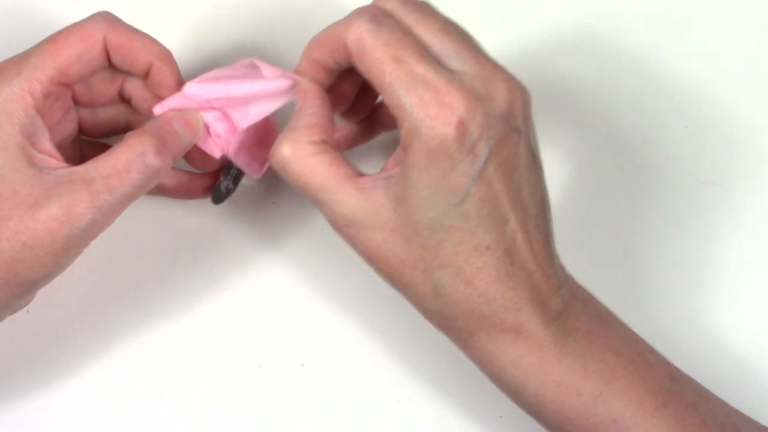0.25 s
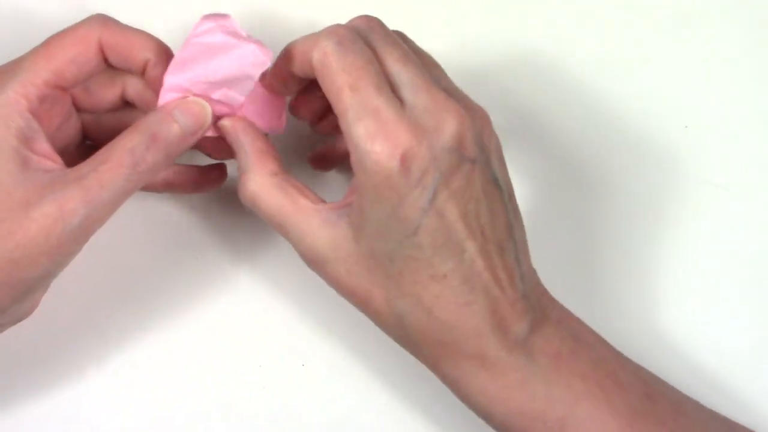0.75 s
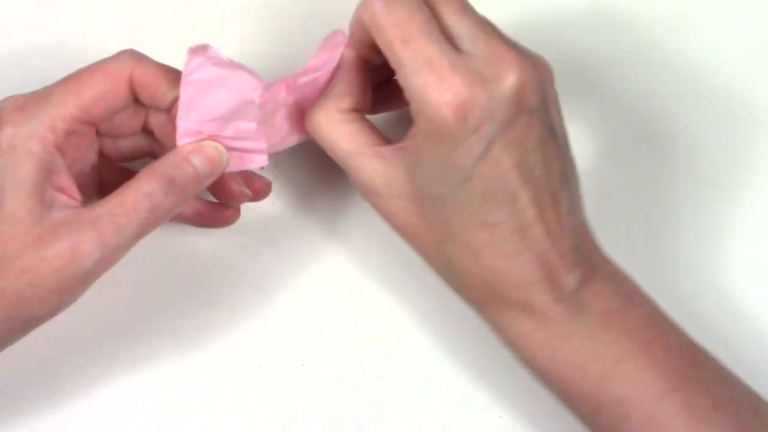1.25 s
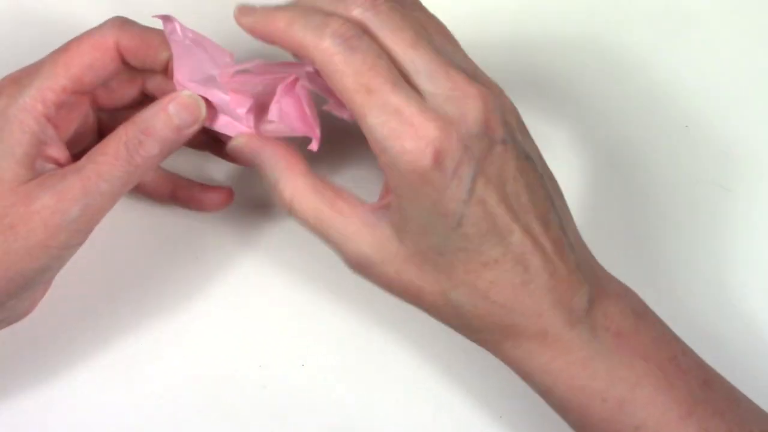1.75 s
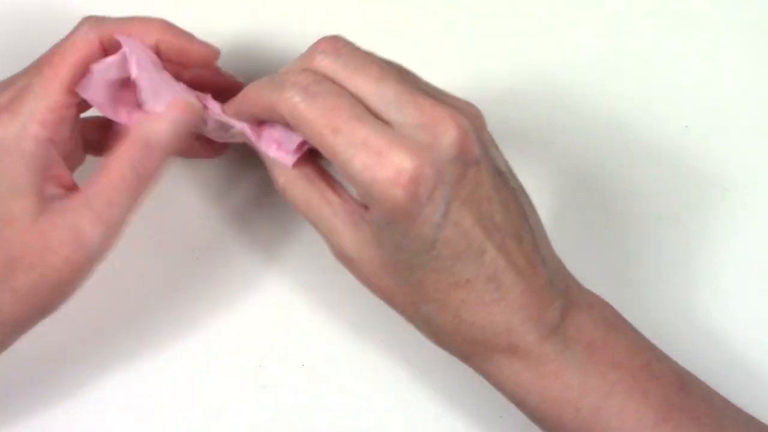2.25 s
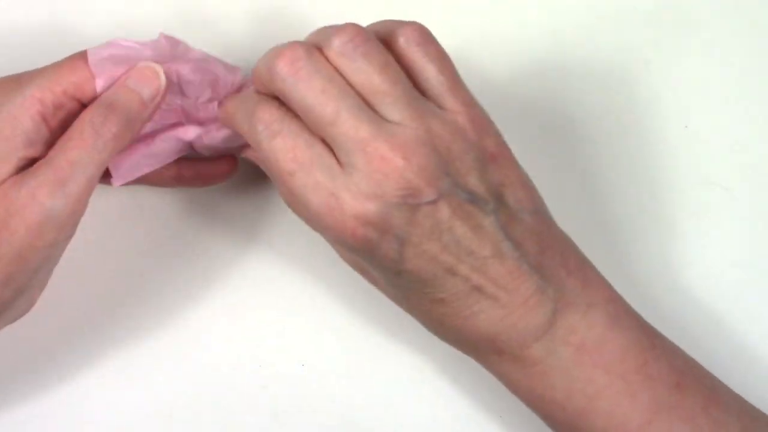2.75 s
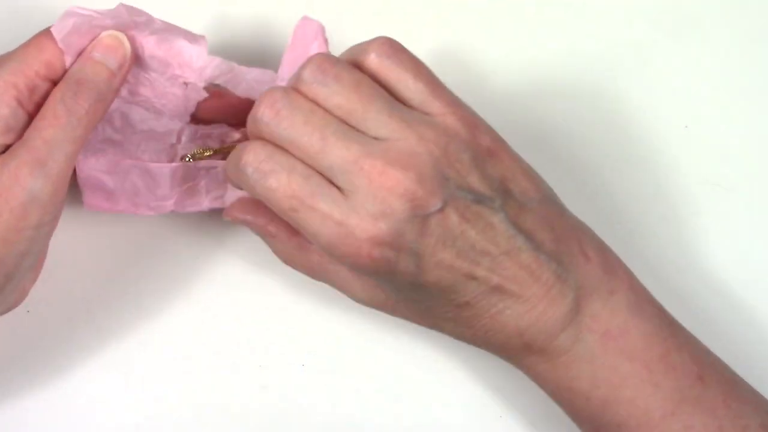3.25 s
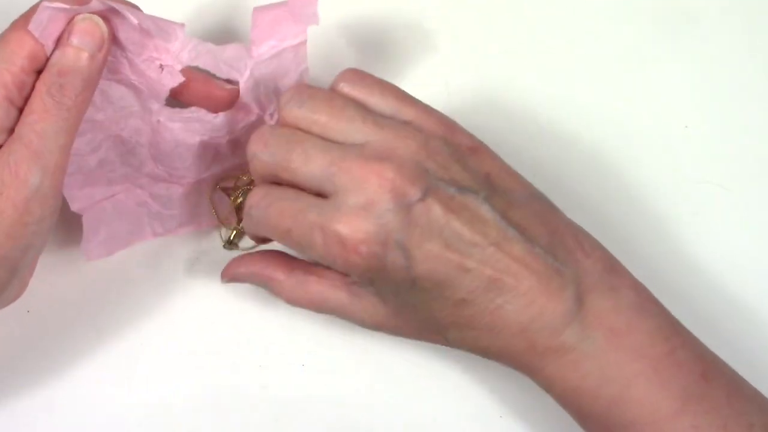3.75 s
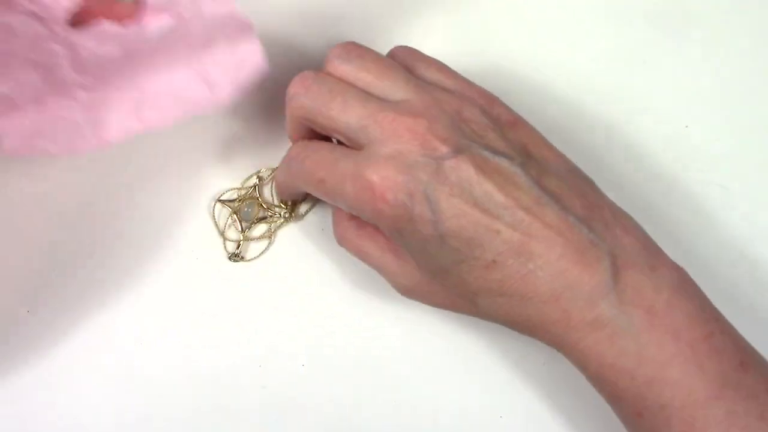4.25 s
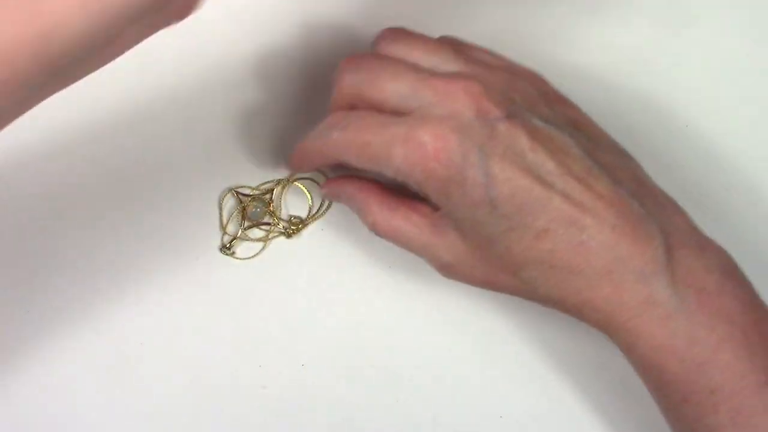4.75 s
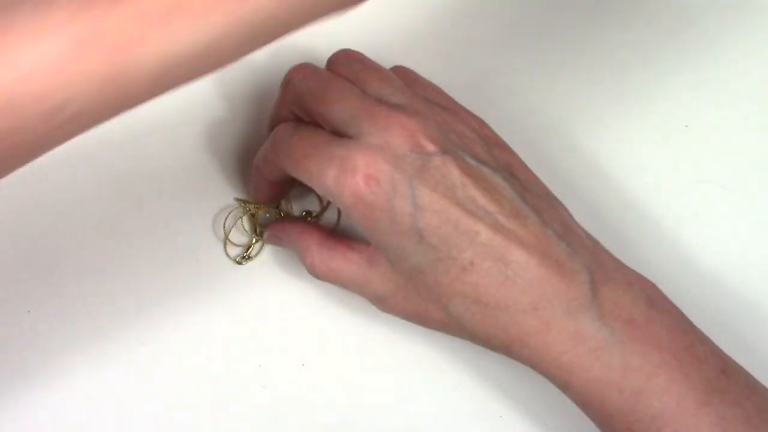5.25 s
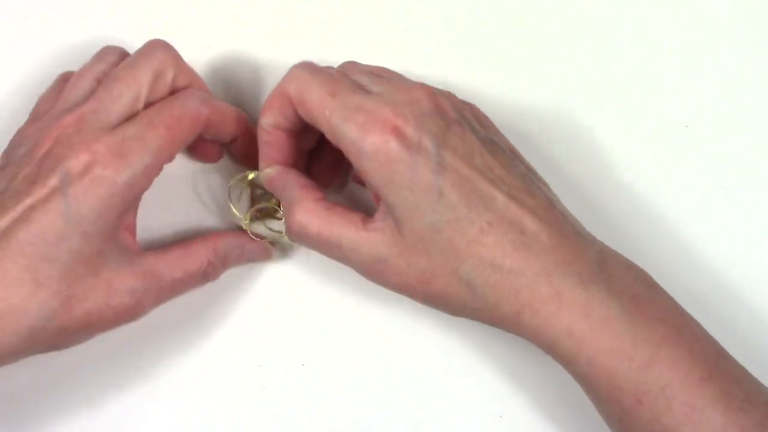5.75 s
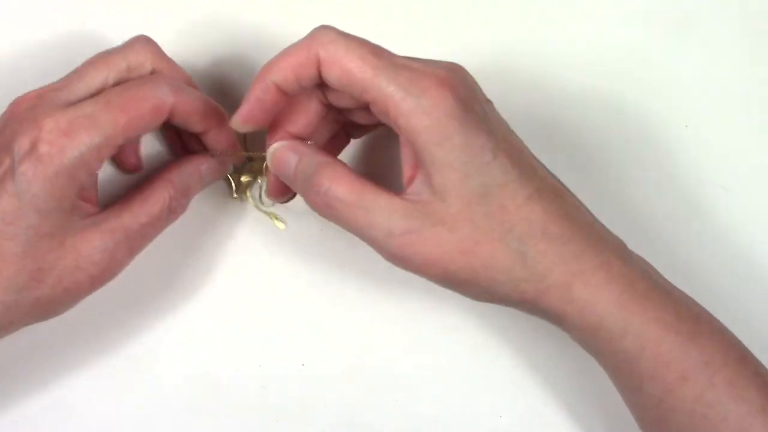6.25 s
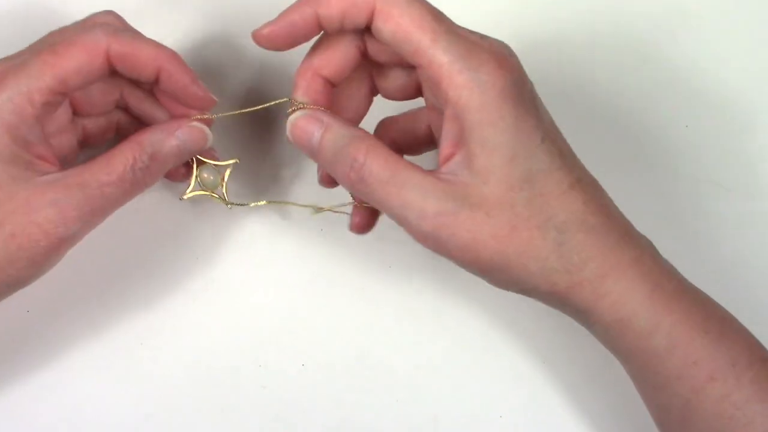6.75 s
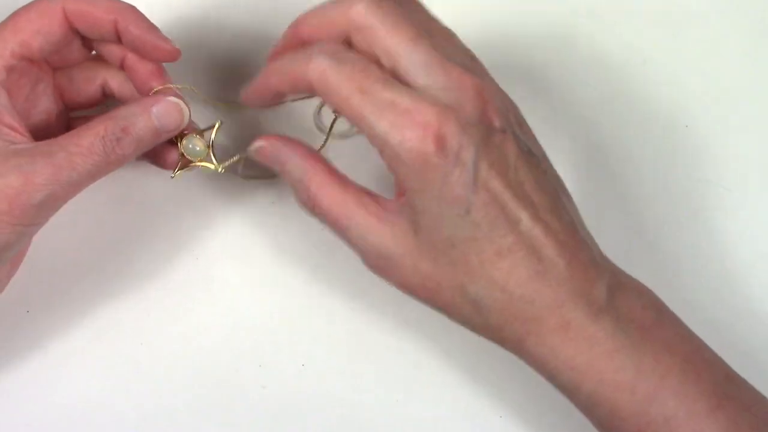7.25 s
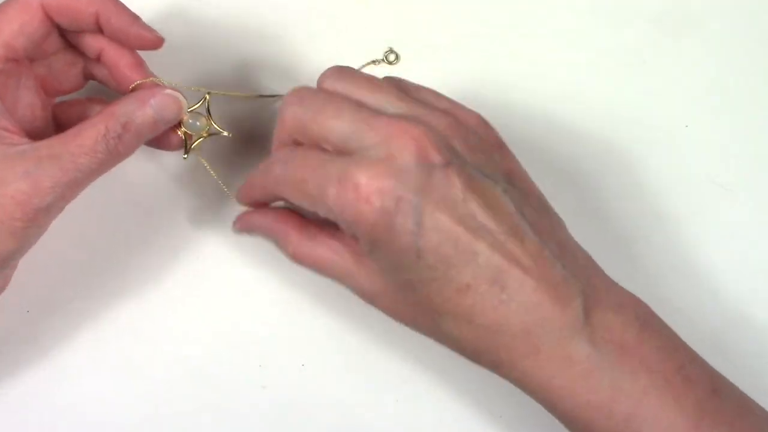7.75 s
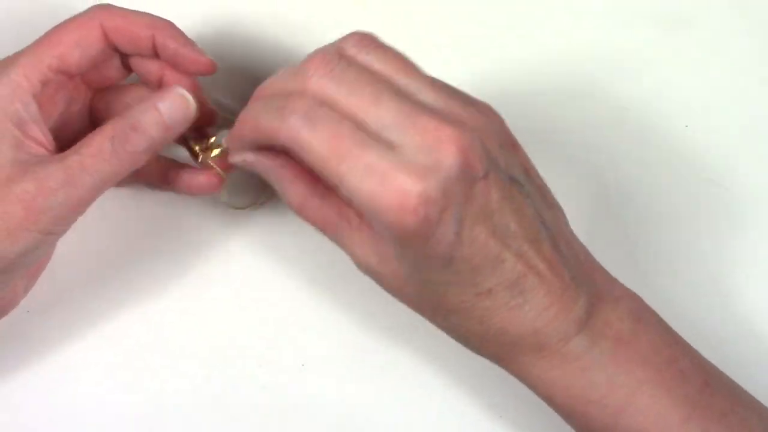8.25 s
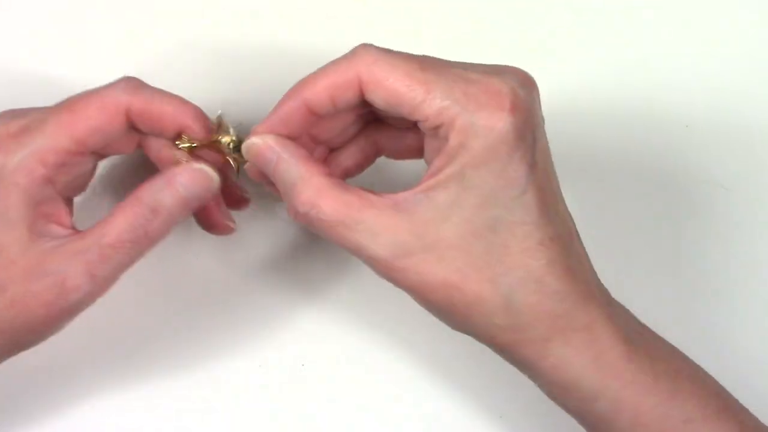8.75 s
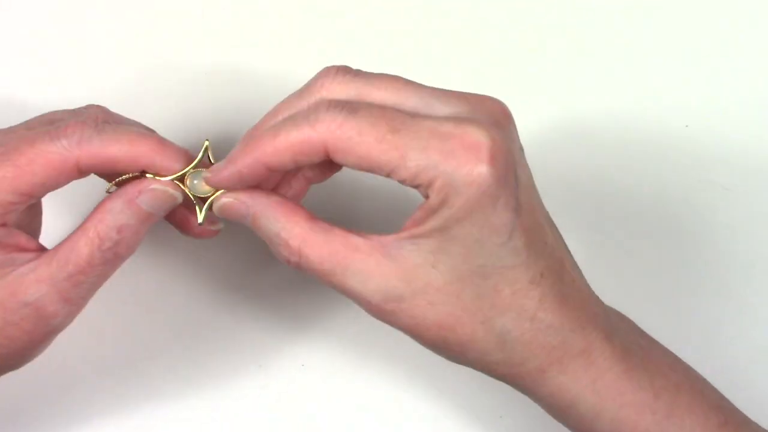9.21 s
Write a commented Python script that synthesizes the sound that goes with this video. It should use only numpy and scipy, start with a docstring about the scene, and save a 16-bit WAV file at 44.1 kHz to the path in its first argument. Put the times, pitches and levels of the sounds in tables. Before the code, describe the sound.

In a quiet room with a low hum and faint, rapid ticking, tissue paper crinkles and snaps in uneven bursts as it is unwrapped close to the microphone. A necklace falls out and knocks sharply on the table top. The paper stops, and fine metal links click, chatter and scrape on the table in short spells, growing softer near the end, while an arm and fingertips bump gently.

```python
"""A table in a quiet room, the microphone close to two hands unwrapping a thin metal necklace.
The tissue paper crackles as its small creases flip, and snaps when a larger one gives way.
The pendant drops and the chain taps, ringing the table top; the links scrape as they slide over it.
Fingertips and an arm thud and rumble on the table. Behind it all the room hums and a faint
mechanism ticks steadily."""
import sys
import numpy as np
from scipy import signal
from scipy.fft import rfft, irfft, next_fast_len
from scipy.io import wavfile
from scipy.ndimage import uniform_filter1d

SR = 44100
rng = np.random.default_rng(int(sys.argv[2]) if len(sys.argv) > 2 else 0)


def waveform_to_disk(signal):
    """Save audio, clipped to [-1, 1], as 16-bit WAV at the path in sys.argv[1]."""
    frames = np.transpose(np.atleast_2d(signal))
    scaled = np.clip(frames, -1, 1) * 32767
    samples = np.round(scaled).astype(np.int16)
    wavfile.write(sys.argv[1], SR, samples)


N = 418068

# Spectra. Each row: frequency in Hz, relative level in dB.
ROOM_TONE = [(18, -47), (30, -20.5), (55, -26.5), (82, -30.5), (101, -22), (171, -5.5), (196, -9),
             (420, -10), (480, -11), (641, -15.5), (979, -18), (11100, -37.5), (15200, -50.5),
             (16500, -60.5)]
STEREO_SPREAD = [(300, -18), (1500, -60.5), (4000, -28), (12000, -5)]  # faint left-right width, mostly in the treble
ARM_RUMBLE = [(25, -16), (50, -12), (115, 4.5), (250, -7), (320, 4.5), (450, -6.5), (800, -43)]
CHAIN_SCRAPE = [(180, -77), (300, -9), (399, -9.5), (539, -28.5), (900, -14.5), (1070, -13.5), (2240, -6.5),
                (6340, -22.5), (15200, -47), (16500, -65.5)]
CHAIN_HEAP = [(180, -65), (300, 3), (671, -3.5), (954, -10), (4170, -16), (6000, -21), (9980, -37),
              (15200, -49), (16500, -59.5)]
TISSUE = [(150, -40.5), (250, -18.5), (320, 1.5), (381, -6.5), (454, -3), (853, 1), (999, -4), (1190, -4),
          (1880, -1), (5470, -5.5), (15100, -24.5), (16500, -42.5)]

# Resonances. Each row: centre in Hz, width in Hz, gain in dB.
TABLE_PEAKS = [(1094, 30, 9.5), (1400, 1000, 8), (1950, 62, 6.5), (2200, 86, 8.5), (3630, 120, 3),
               (4600, 1100, 2)]  # the table top under the links
HEAP_PEAKS = [(1850, 250, 1.5), (2800, 250, 6), (3880, 700, 5)]  # the dull jingle of heaped links
POCKET_PEAKS = [(1220, 300, 7), (850, 250, 2), (2900, 900, -3), (5000, 2500, 2)]  # air cupped by paper and palms, and the sheet's own colour

# Ringing modes. Each row: frequency in Hz, relative level in dB, t60 in seconds.
MECHANISM_MODES = [(1470, 2, .03), (1830, 4, .03), (2293, 2, .03)]
TABLE_MODES = [(690, -9, .02), (1080, -7, .02), (1300, -5, .02), (1550, 0, .02), (1800, 1, .02),
               (2100, -5, .014), (2400, -10, .01), (2800, 0, .014), (3300, -1, .013), (3750, -4, .011),
               (4200, -3, .01), (4600, -8, .008), (5400, -15, .006)]

# Hand strokes. Each row: start and length in seconds, first and last mid-range level in dB,
# then lows (table body or air pocket) and highs (links or finest creases) in dB above the mids.
CHAIN_DRAGS = [(4.275, 0.08, -44, -33.5, -16, -6), (4.355, 0.039, -43, -47, 0, -11),
               (7.13, 0.065, -29, -40, -29, -3.5), (7.22, 0.11, -29, -40.5, -16, -5),
               (7.36, 0.013, -69, -46.5, -12, -3.5), (7.578, 0.029, -48.5, -48, -24, -6),
               (7.812, 0.054, -37.5, -42.5, -31, -2), (8.3, 0.36, -70, -67, -8.5, 5.5),
               (8.57, 0.012, -46, -48, -28, -3.5), (8.63, 0.085, -55.5, -43, -30, -0.5),
               (8.74, 0.36, -42, -39.5, -16.5, -5.5), (9.11, 0.075, -46.5, -55, -8, -12),
               (9.4, 0.063, -43.5, -36.5, -17, -9)]
CHAIN_GATHERS = [(5.13, 0.18, -36, -52, -11.5, -1.5), (5.34, 0.038, -54, -46, 2.5, -1),
                 (5.39, 0.079, -32, -49, -20, -4), (5.48, 0.14, -49, -51, -22, -3.5),
                 (5.575, 0.014, -37, -51, -25, -1.5), (5.63, 0.082, -45.5, -38, -7, -5.5),
                 (5.75, 0.054, -38, -37.5, -11, 0), (5.85, 0.11, -48, -40.5, -5.5, 0),
                 (6, 0.04, -41.5, -32, -9, -5), (6.11, 0.21, -45, -39, -8, -3.5)]
PAPER_TUGS = [(0.005, 0.095, -30.5, -44, -6.5, -7.5), (.15, 0.034, -39.5, -39.5, -8.5, -3),
              (.215, 0.031, -22.5, -24.5, -8, -2), (.33, 0.09, -54.5, -40, 0.5, -4),
              (.47, 0.058, -47.5, -46, -2, -2.5), (.7, 0.085, -42.5, -36.5, -9, -3.5),
              (.83, 0.1, -40, -43, -6.5, -4.5), (.98, 0.045, -34, -44.5, -6, -1.5),
              (1.03, 0.03, -36.5, -29.5, -12, 5), (1.115, 0.098, -27.5, -23.5, -8.5, -3.5),
              (1.27, .2, -44.5, -46, -2.5, -2.5), (1.55, 0.048, -43.5, -49.5, -2.5, -8),
              (1.78, 0.17, -34, -42, -4.5, -4.5), (1.99, 0.16, -68, -49.5, -9, -5),
              (2.2, 0.073, -38.5, -33.5, -3, -5), (2.29, 0.18, -36.5, -45, -3, -4.5),
              (2.5, 0.094, -78, -53.5, 5.5, -4), (2.62, 0.25, -45, -39.5, -3, -6),
              (2.92, 0.1, -34.5, -35.5, -5, -9.5), (3.05, 0.13, -53, -54.5, 1.5, -8),
              (3.2, 0.14, -44, -50.5, -4.5, -8), (3.345, 0.18, -34.5, -39, -0.5, -7.5),
              (3.5, 0.237, -48, -36.5, -6.5, -10.5), (3.76, 0.45, -55.5, -57.5, 6.5, -9.5),
              (3.97, 0.17, -49.5, -45, -4.5, -3.5), (4.14, 0.032, -45.5, -44.5, 0.5, -7.5),
              (4.2, 0.044, -47, -55, -18, -9), (4.42, 0.045, -75, -49.5, -3, -3.5),
              (4.5, 0.032, -54, -45, -10, -6), (4.57, 0.32, -52, -55.5, 1.5, -8.5),
              (4.9, 0.019, -54, -40, -1, -5), (4.96, 0.074, -55.5, -57.5, 2, -8),
              (5.06, 0.012, -41, -36.5, -4.5, -9), (5.12, .16, -64, -73, -5, -10)]

# The room's hum. Each row: frequency in Hz, level in dB, width in Hz, ratio of steady to wavering.
HUM_LINES = [(53.5, -70.5, 4, .3), (119.2, -60, 17, 0.63), (172.8, -59.5, 3, 7.5)]
# The room's decay. Each row: frequency in Hz, t60 in seconds.
ROOM_DECAY = [(300, 0.18), (1500, 0.16), (5000, 0.1), (12000, 0.019)]
# A forearm shifting its weight. Each row: time in seconds, level in dB.
ARM_LEVELS = [(4.2, -78), (4.432, -50.5), (5.464, -51.5), (5.592, -44), (5.62, -54), (5.9, -61)]
# A fingertip or wrist set down. Each row: start in seconds, relative level in dB, pitch in Hz,
# t60 in seconds.
THUDS = [(4.526, -45, 350, 0.084), (5.17, -43.5, 90, .15), (5.51, -42, 109, 0.17), (5.57, -41, 304, 0.12),
         (5.778, -33, 323, 0.051), (6.044, -27, 543, 0.053), (7.0575, -31.5, 310, 0.14)]
# Pendant and links landing. Each row: start in seconds, level in dB, centre of the blow in octaves
# above 1 kHz, sharp tick in dB above the level, change per rebound in dB.
METAL_TAPS = [(3.715, 2.5, 0.59, -21, -6), (3.723, 2, 0.41, -20, -8), (3.773, -29, 1.5, 1, 1.5),
              (3.79, -40, 1.4, -1, -15), (4.26, -18.5, 1.18, -25, -6), (5.3932, -19.5, 1.74, -10, -9),
              (5.405, -15.5, 2.6, -9, -13), (5.4275, -12.5, 2.7, -14, -6), (5.442, -20, 2.5, -15, -12),
              (5.4595, -19, 2.4, -25, -25), (5.4715, -24, 2.2, -16, -25), (5.99, -23, 1.6, -32, -17),
              (6.034, -24.5, 0.2, -17, 1), (6.1105, -7, 1.52, -18, -30), (6.137, -17.5, 1.3, -31, -2.5),
              (6.151, -29, 1.3, -27, -20), (6.1585, -23, 1.6, -27, -20), (6.1673, -25.5, 0.83, -8, 2),
              (6.172, -11.5, 1.52, -20, -8), (6.185, -30, 1.9, -25, -20), (6.193, -29, 1.3, -25, -20),
              (6.199, -29, 1.5, -25, -20), (6.217, -20, 1.27, -30, -10), (6.234, -25, 1.6, -15, -20),
              (6.29, -20, 1.7, -18, -11), (6.2928, -13.5, 0.15, -16, -30), (7.1152, -5.5, 0.99, -6, -18),
              (7.155, -33, 0.57, -28, 3), (7.222, -12, 1.7, -20, -9), (7.252, -20, 1.5, -1, -13),
              (7.276, -25.5, 1.3, 8, -6), (7.287, -18, 1.4, -14, -18), (7.318, -24, 1.2, -28, -14),
              (7.324, -22.5, 1.5, -15, -10), (8.294, -43.5, 2.8, -18, 2.5), (8.368, -41, 2.8, -23, -2),
              (8.704, -40, 0.92, 3.5, -5.6), (9.459, -29, 1.5, -1.5, -16)]
# Single creases giving way. Each row: start in seconds, mid-range peak in dB, pocket in dB above it.
PAPER_SNAPS = [(0.004, -37, -5), (0.0105, -10.5, -13.5), (0.0375, -24.5, 1), (0.0435, -12.5, -14),
               (0.0807, -18, -2), (0.142, -25, 7.5), (0.1585, -25, 1), (0.1715, -13, -1.5),
               (0.186, -11, -6), (0.2169, -9, 0), (0.2225, -9, -10.5), (0.2404, -21, 11),
               (0.254, -9.5, -5.5), (0.2603, -5.5, -25), (0.3925, -20, -7.5), (0.408, -47, -11),
               (0.4314, -22, -2.5), (0.516, -29.5, 1.5), (0.664, -40, -4), (0.7235, -32, -14),
               (0.7786, -42, -5), (0.803, -20, -12), (0.815, -20, -20), (0.823, -15.5, -33),
               (0.842, -16, -29), (0.8909, -24, -11), (0.9792, -23, -17), (1.0011, -17.5, -10),
               (1.0311, -13.5, -11.5), (1.0655, -20.5, -9), (1.112, -24, 4), (1.1313, -12, -12),
               (1.1665, -6, -14), (1.1844, -16.5, 5.5), (1.2165, -26.5, 8), (1.2221, -21.5, 11),
               (1.2365, -17, 0), (1.249, -18, -6), (1.272, -31, -11), (1.2865, -24, -20),
               (1.2965, -28, -20), (1.3139, -23, -10), (1.406, -28.5, -15), (1.5464, -36.5, -2),
               (1.773, -42.5, 12), (1.8058, -15.5, -2.5), (2.0183, -28, -11), (2.0627, -31, -33),
               (2.176, -33, -15), (2.219, -30, -2), (2.2273, -19.5, -8), (2.2633, -22, -26),
               (2.2822, -18, -2), (2.3755, -26, -25), (2.459, -29, -6), (2.6245, -21, -5),
               (2.6295, -35.5, 13.5), (2.6933, -21.5, 1), (2.7162, -22.5, -2.5), (2.7283, -23, -10),
               (2.7485, -30, -4), (2.7604, -37, -8), (2.765, -36, 19.5), (2.7821, -22, 3),
               (2.794, -36, -0.5), (2.84, -27, -20), (2.855, -27, -20), (2.875, -28, -23),
               (2.8924, -24.5, -24), (2.9238, -37, 4), (3.0358, -41, 12), (3.243, -36, -13),
               (3.287, -32, 2.5), (3.3209, -25, -6), (3.328, -34.5, 11.5), (3.3448, -34.5, 17.5),
               (3.3598, -29, 12), (3.3762, -17, -12), (3.387, -27.5, 12.5), (3.399, -29, -9),
               (3.5057, -40, -16), (3.5673, -20.5, -12), (3.6193, -24, -27), (3.686, -19.5, -23),
               (3.9994, -30, -13), (4.161, -40, 3), (4.169, -38, 16.5), (5.0689, -19.5, -6.5),
               (5.2225, -26.5, -25)]

PAPER_SPLIT_HZ, CHAIN_SPLIT_HZ = (2000, 7000), (900, 2800)
LEFT_RIGHT = np.array([[1], [-1]])


def amp(db):
    return 10 ** (np.asarray(db) / 20)


def unit_rms(x):
    return x / np.sqrt(np.mean(x ** 2, axis=-1, keepdims=True) + 1e-20)


def value_at(points, hz):
    f, value = np.transpose(points)
    return np.interp(np.log(hz + 1), np.log(f + 1), value)


def add(mix, start, sound):
    part = mix[max(round(start * SR), 0):][:len(sound)]
    part += sound[:len(part)]


def highpass(x, hz):
    return signal.sosfilt(signal.butter(2, hz, "high", fs=SR, output="sos"), x)


def coloured(x, spectrum, peaks=()):
    """Filter a sound by a spectrum and its resonances."""
    size = next_fast_len(x.shape[-1])
    f = np.fft.rfftfreq(size, 1 / SR)
    peaks_db = sum(db / (1 + (2 * (f - hz) / width) ** 2) for hz, width, db in peaks)
    return irfft(rfft(x, size) * amp(value_at(spectrum, f) + peaks_db), size)[..., :x.shape[-1]]


def three_bands(x, edges_hz):
    kinds = [(edges_hz[0], "low"), (edges_hz, "band"), (edges_hz[1], "high")]
    return [signal.sosfilt(signal.butter(3, hz, kind, fs=SR, output="sos"), x) for hz, kind in kinds]


def wander(samples):
    return unit_rms(uniform_filter1d(rng.standard_normal(N), size=samples))


def drifting(x, depth_db):
    """The colour drifts in patches as things move."""
    spectra = signal.stft(x, nperseg=512)[2]
    patches = uniform_filter1d(rng.standard_normal(spectra.shape), size=9, axis=0)
    patches = uniform_filter1d(patches, size=14, axis=1)
    return signal.istft(spectra * amp(depth_db * patches / patches.std()), nperseg=512)[1][:N]


def ring(modes, t, phase, weight=1):
    """Struck modes die away as damped sines; phase is in cycles."""
    hz, db, t60 = np.transpose(modes)[:, :, None]
    return (weight * amp(db - 60 * t / t60) * np.sin(2 * np.pi * (hz * t + phase))).sum(0)


def grains(per_s, spread_db, clump_db, t60, hiss, colour_db, colours):
    """Tiny slips in clumps: short dying bursts in a few colours, over a fine hiss."""
    clumps = amp(clump_db * wander(500))
    strength = amp(spread_db * np.minimum(rng.exponential(1, N), 4))
    slips = strength * (rng.random(N) < per_s / SR)
    kind, t, out = rng.integers(0, colours, N), np.arange(512) / SR, np.zeros(N)
    for k in range(colours):
        tint = np.c_[np.geomspace(500, 15000, 6), colour_db * rng.standard_normal(6)]
        burst = coloured(rng.standard_normal(512), tint) * amp(-60 * t / t60)
        out += signal.oaconvolve(slips * (kind == k), burst / np.linalg.norm(burst))[:N]
    return clumps * (unit_rms(out) + hiss * rng.standard_normal(N))


def stroke(start, length, first_db, last_db, rise_db_per_s, fall_db_per_s=356):
    """Gain of one stroke: quick rise, steady drift from first level to last, slower release."""
    t = np.arange(N) / SR - start
    drift_db = np.interp(t, [0, length], [first_db, last_db])
    return amp(drift_db + rise_db_per_s * np.minimum(t, 0) - fall_db_per_s * np.maximum(t - length, 0))


def rubbed(strokes, texture, edges_hz, rise_db_per_s=1498.5):
    """A grainy sound whose three bands follow the strokes of the hands."""
    bands = [x / np.sqrt(uniform_filter1d(x ** 2, 6000) + 1e-20) for x in three_bands(texture, edges_hz)]
    gains = np.array([stroke(*row[:4], rise_db_per_s) for row in strokes])
    shares = amp([(low_db, 0, high_db) for *_, low_db, high_db in strokes])
    return (shares.T @ gains * bands).sum(0)


def room_tone():
    """Soft noise and a hum of wavering lines, almost alike in both channels."""
    t = np.arange(N) / SR
    mid, side = amp(-56) * unit_rms(coloured(rng.standard_normal((2, N)), ROOM_TONE))
    for hz, db, width_hz, steady in HUM_LINES:
        pole = np.exp(-np.pi * width_hz / SR)
        waver = signal.lfilter([1], [1, -pole], rng.standard_normal(N) + 1j * rng.standard_normal(N))
        line = (steady + waver / waver.std()) * np.exp(2j * np.pi * hz * t)
        mid = mid + amp(db) * unit_rms(line.real)
    return mid + amp(-10) * side * LEFT_RIGHT


def mechanism(ticks_per_s=14.985):
    """A faint mechanism rings briefly at each regular tick, a little uneven in strength."""
    out, t = np.zeros(N), np.arange(2000) / SR
    for start in np.arange(.012, N / SR, 1 / ticks_per_s):
        db = -56.5 + 2 * rng.standard_normal()
        phase = rng.standard_normal((len(MECHANISM_MODES), 1))
        add(out, start, amp(db) * ring(MECHANISM_MODES, t, phase) * np.minimum(t / .0029, 1))
    return out


def room_echoes(x):
    """Sparse reflections reach the microphone, the treble dying first; a faint width is added."""
    reflections = np.zeros((2, SR // 2))
    arrivals = np.arange(200, SR // 2 - 20, 20) + rng.integers(0, 20, (2, (SR // 2 - 201) // 20))
    np.put_along_axis(reflections, arrivals, rng.choice([-1., 1.], arrivals.shape), 1)
    hz, t, spectra = signal.stft(reflections, SR, nperseg=256)
    decay = amp(-60 * t / value_at(ROOM_DECAY, hz)[:, None])
    tail = signal.istft(spectra * decay, SR, nperseg=256)[1]
    mid, side = signal.fftconvolve(x[None], tail / np.linalg.norm(tail[0]), axes=1)[:, :N]
    return drifting(mid, depth_db=3) + coloured(side, STEREO_SPREAD) * LEFT_RIGHT


def arm_and_fingers():
    """The low rumble of an arm leaning on the table, and dull pushes of fingertips or wrist."""
    arm_db = np.interp(np.arange(N) / SR, *np.transpose(ARM_LEVELS), left=-np.inf, right=-np.inf)
    out = amp(arm_db + 4.7 * wander(2500)) * unit_rms(coloured(rng.standard_normal(N), ARM_RUMBLE))
    t = np.arange(6000) / SR
    for start, db, hz, t60 in THUDS:
        flesh = [(hz / 3, -25), (hz, 0), (2 * hz, -8), (8 * hz, -26), (30 * hz, -60)]
        push = unit_rms(coloured(rng.standard_normal(len(t)), flesh))
        add(out, start, amp(db + 6) * push * amp(-60 * t / t60) * np.minimum(t / .0083, 1))
    return out


def chain_slide():
    """Fine links catch abruptly and drag in a dense scrape; gathered in a heap, they tick more."""
    smooth = grains(per_s=2000, spread_db=2.5, clump_db=1, t60=.006, hiss=1.3, colour_db=3, colours=3)
    ticky = grains(per_s=700, spread_db=3, clump_db=1.8, t60=.006, hiss=1.3, colour_db=2.5, colours=4)
    scrape = coloured(smooth, CHAIN_SCRAPE, TABLE_PEAKS)
    jingle = coloured(ticky, CHAIN_HEAP, HEAP_PEAKS)
    drag = rubbed(CHAIN_DRAGS, scrape, CHAIN_SPLIT_HZ, rise_db_per_s=2200)
    return drag + rubbed(CHAIN_GATHERS, jingle, CHAIN_SPLIT_HZ)


def metal_taps(rebound_s=.004, contact_s=.0006):
    """Metal chatters on the table top: a sharp tick, and the modes near the blow's centre ring."""
    out, t, bounces = np.zeros(N), np.arange(4000) / SR, np.arange(5)
    hz = np.transpose(TABLE_MODES)[0][:, None]
    polarity = np.arange(len(hz))[:, None] % 2 / 2
    for start, db, octaves, tick_db, rebound_db in METAL_TAPS:
        noise = rng.standard_normal(len(t))
        tick = unit_rms(highpass(coloured(noise, CHAIN_SCRAPE), 4120))
        tick *= amp(-60 * t / .019) * np.minimum(t / .00059, 1)
        blow = .22 * noise * np.exp(-t / .0035)  # the contact rattles for some milliseconds
        bounce_s = bounces * rebound_s * np.clip(1 + .1 * noise[-5:], .7, 1.3)
        blow[np.round(bounce_s * SR).astype(int)] += 3.4 * amp(rebound_db * bounces)
        modes = np.array(TABLE_MODES)
        modes[:, 0] *= 1 + .025 * noise[-40:][:len(hz)]  # each spot of the table has its own tuning
        weight = np.exp(-((np.log2(hz / 1e3) - octaves) / .7) ** 2)
        ringing = ring(modes, t, polarity, weight) * np.minimum(t / contact_s, 1)
        body = signal.fftconvolve(ringing, np.convolve(np.hanning(5), blow))[:len(t)]
        add(out, start, amp(db) * (body / abs(body).max() + amp(tick_db) * tick))
    return highpass(highpass(out, 290), 290)


def paper_crackle():
    """Many small creases flip as the tissue is pulled open; fewer dry ticks stand out of them."""
    ticks = grains(per_s=130, spread_db=.5, clump_db=1, t60=.0021, hiss=0, colour_db=3.5, colours=6)
    fine = grains(per_s=900, spread_db=2.6, clump_db=2.4, t60=.005, hiss=.7, colour_db=3, colours=10)
    creases = coloured(fine + amp(-5) * ticks, TISSUE, POCKET_PEAKS)
    return rubbed(PAPER_TUGS, drifting(creases, depth_db=1.6), PAPER_SPLIT_HZ)


def paper_snaps(crease_hz=4700, pop_hz=1180, band_t60s=(.035, .025, .016)):
    """A larger crease flips: a bright burst, and a hollow pop in the palms, pitched by the grip."""
    out, t = np.zeros(N), np.arange(2000) / SR
    attack = (1 + .3 * np.exp(-t / .0008)) * np.minimum(t / .0006, 1)
    variations = rng.standard_normal((len(PAPER_SNAPS), 3))
    for (start, db, pocket_db), (fine, grip, tint) in zip(PAPER_SNAPS, variations):
        crease_peak = [(crease_hz * np.exp(.16 * tint), 2200, 7)]
        crease = coloured(rng.standard_normal(len(t)), TISSUE, POCKET_PEAKS + crease_peak)
        bands = three_bands(crease, PAPER_SPLIT_HZ)
        bursts = [x * attack * amp(-60 * t / t60) for x, t60 in zip(bands, band_t60s)]
        low, mid, high = (x / abs(x).max() for x in bursts)
        pocket = low + ring([(pop_hz * np.exp(.15 * grip), 2, .022)], t, phase=0)
        snap = mid + amp(pocket_db) * pocket / abs(pocket).max() + amp(-2.5 - .5 * fine) * high
        add(out, start, amp(db) * snap)
    return highpass(out, 370)


def scene():
    """Paper, necklace and hands close up and central, the room well behind them."""
    near = paper_crackle() + paper_snaps() + chain_slide() + metal_taps() + arm_and_fingers()
    return near + amp(-14.5) * room_echoes(near) + mechanism() + room_tone()


def record(dry, ceiling=1.1, top_hz=16600):
    """The small microphone loses deep bass, the preamp rounds the peaks, and the top treble is cut."""
    rounded = ceiling * np.tanh(highpass(dry, 38) / ceiling)
    lowpass = signal.firwin(511, top_hz, window=("kaiser", 9), fs=SR)
    return signal.oaconvolve(rounded, lowpass[None], "same")


dry = scene()
out = record(dry)
waveform_to_disk(out)
```